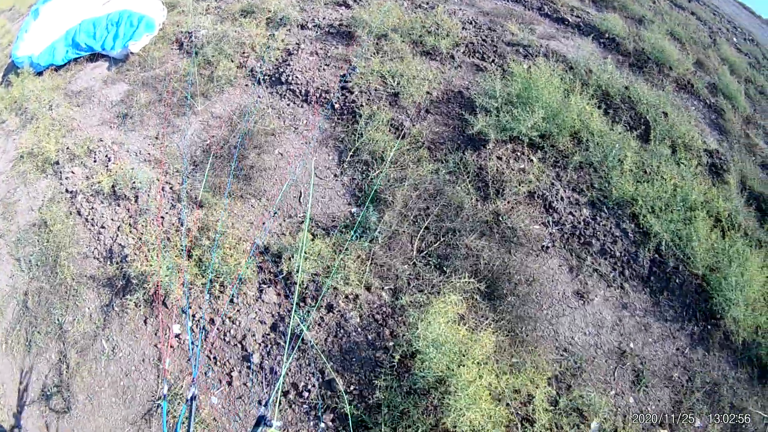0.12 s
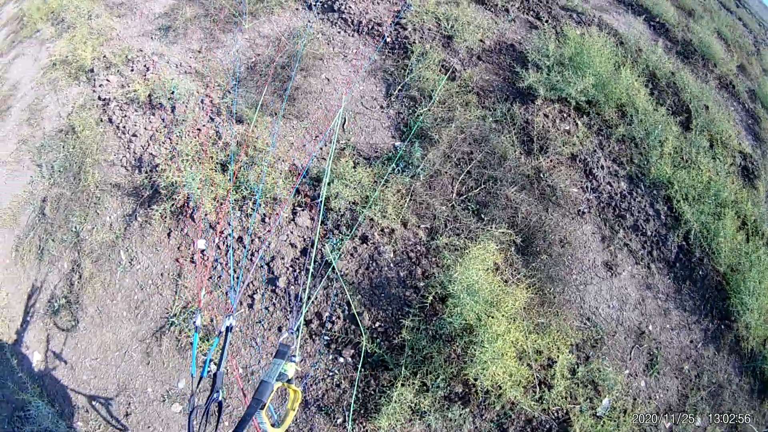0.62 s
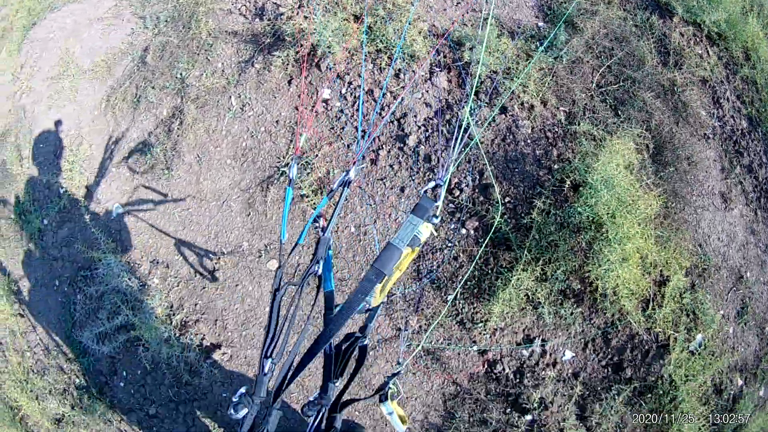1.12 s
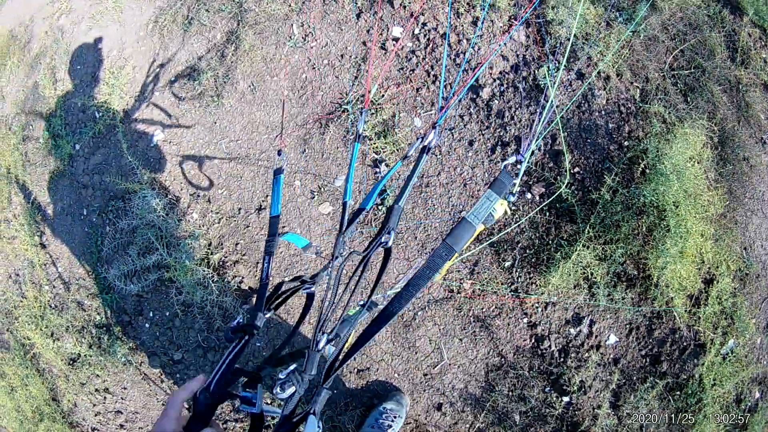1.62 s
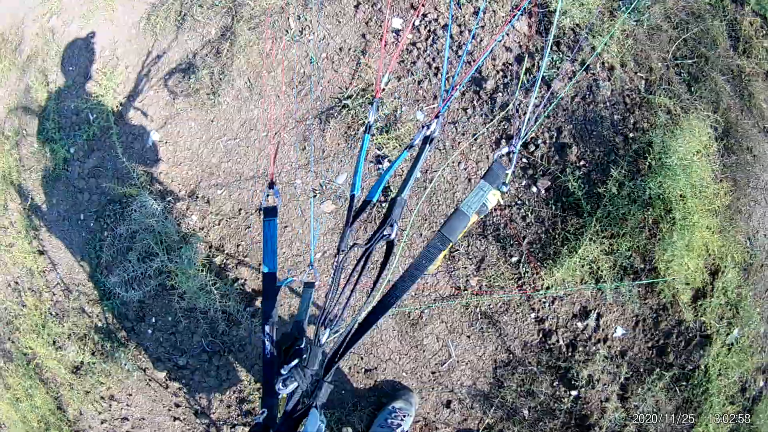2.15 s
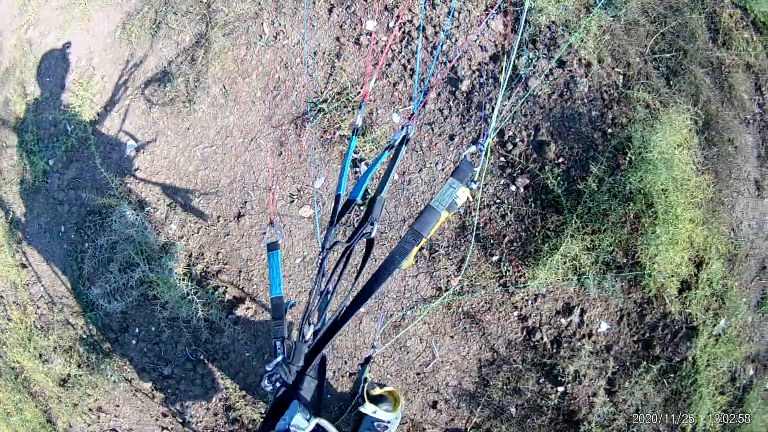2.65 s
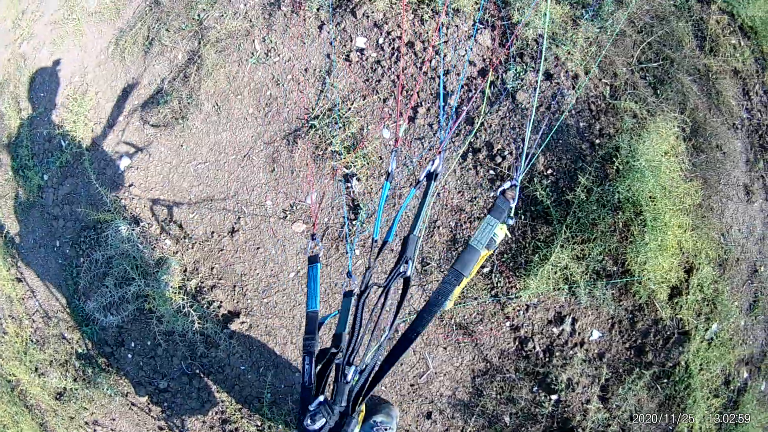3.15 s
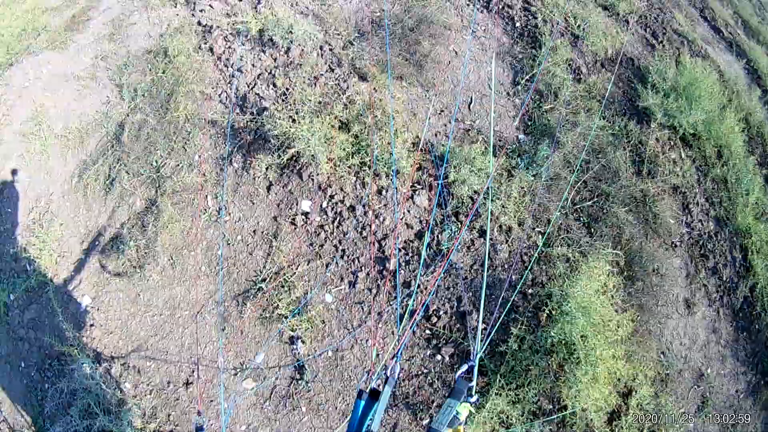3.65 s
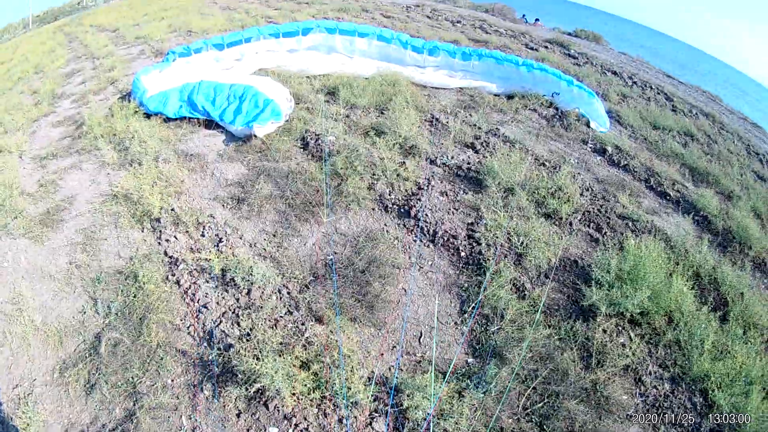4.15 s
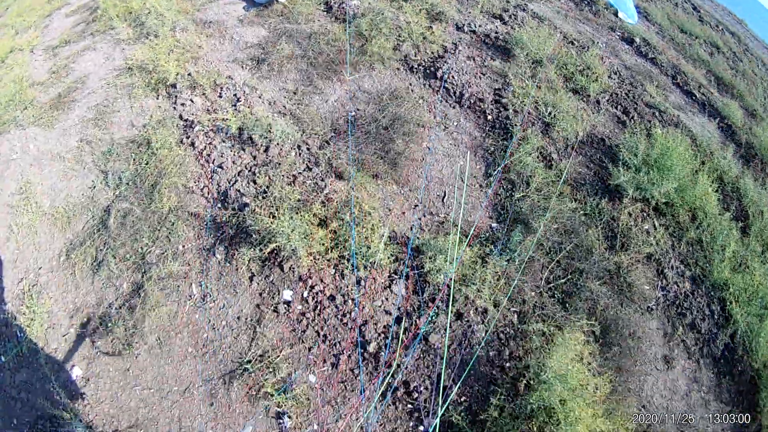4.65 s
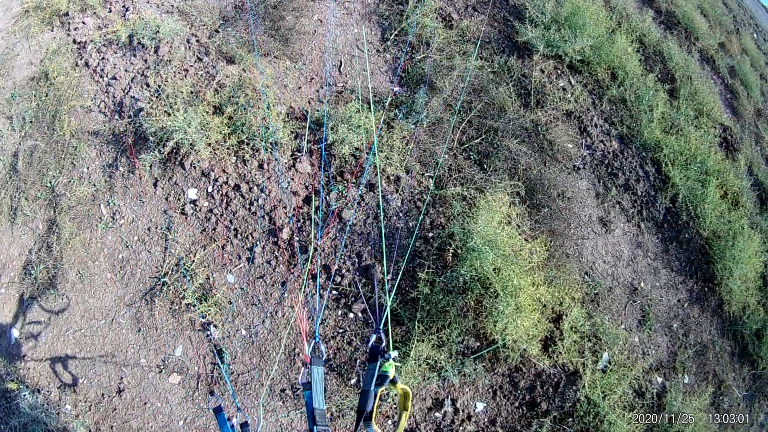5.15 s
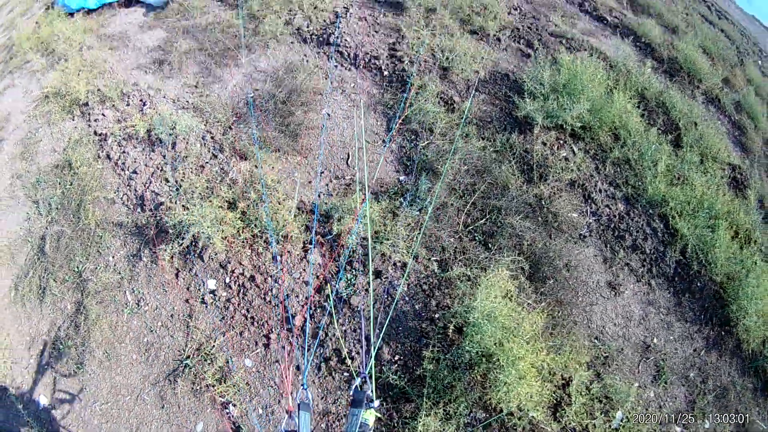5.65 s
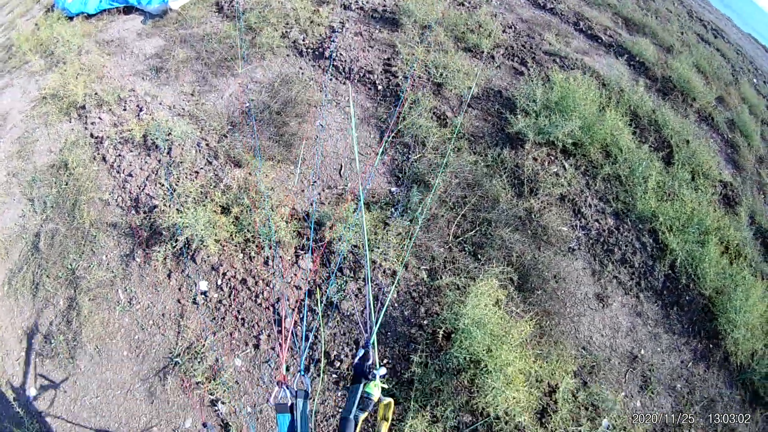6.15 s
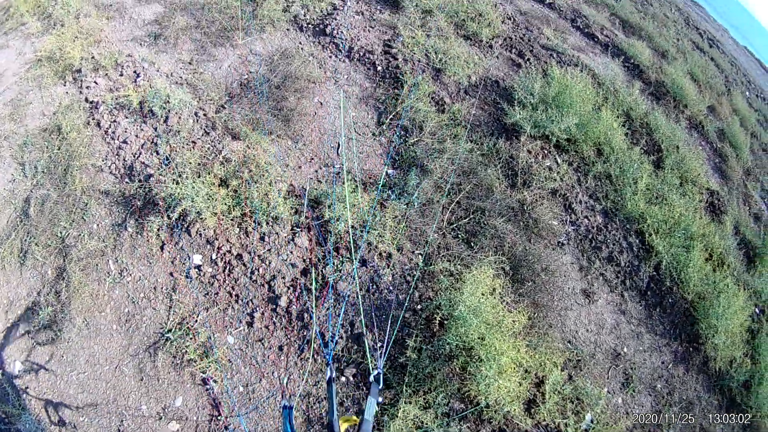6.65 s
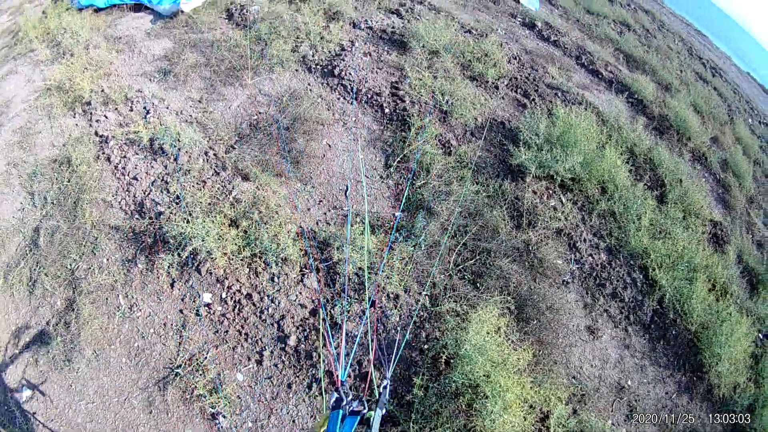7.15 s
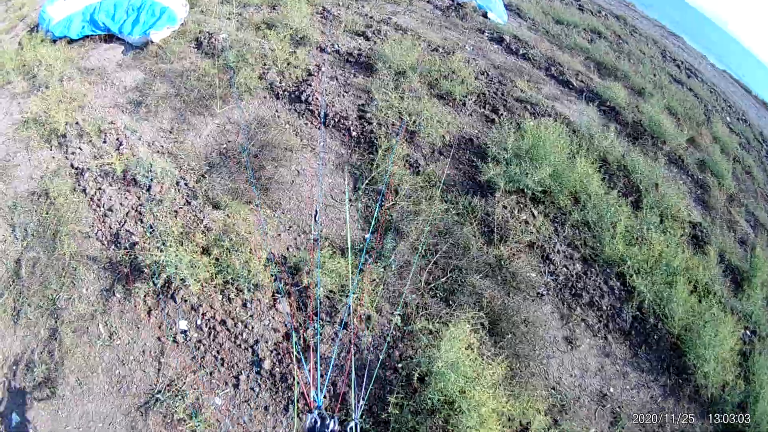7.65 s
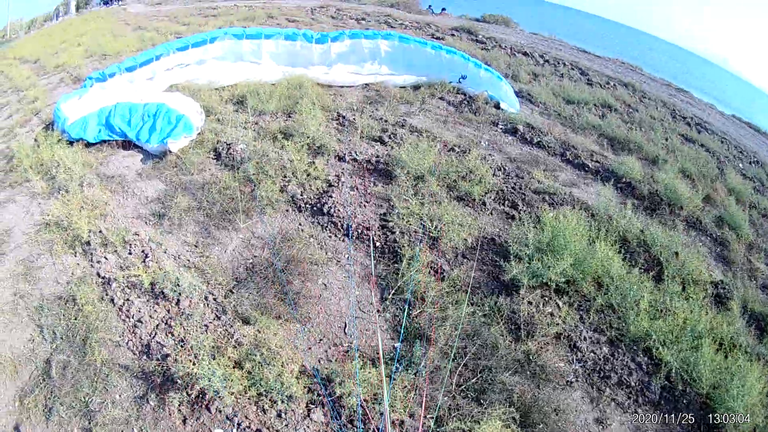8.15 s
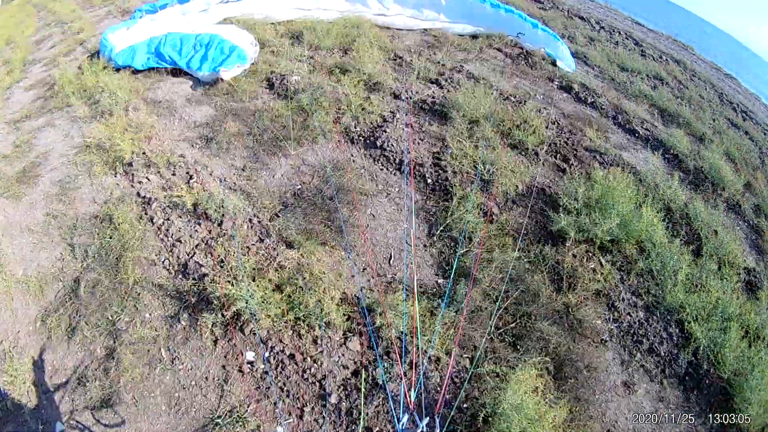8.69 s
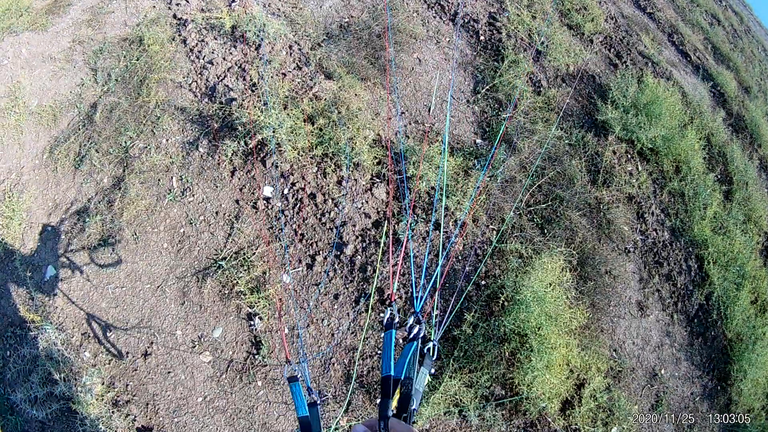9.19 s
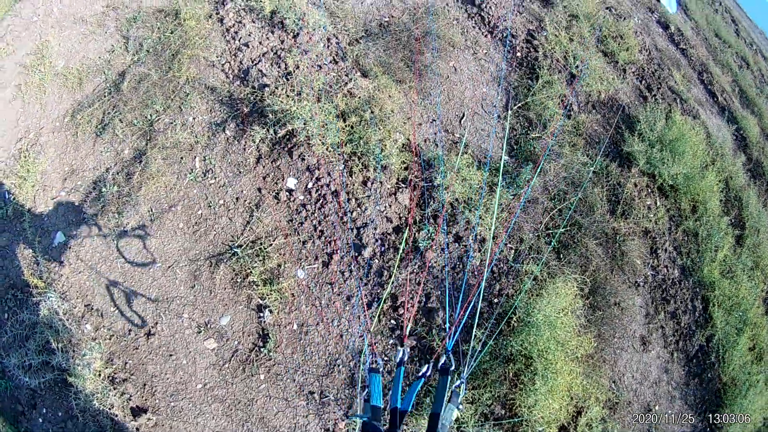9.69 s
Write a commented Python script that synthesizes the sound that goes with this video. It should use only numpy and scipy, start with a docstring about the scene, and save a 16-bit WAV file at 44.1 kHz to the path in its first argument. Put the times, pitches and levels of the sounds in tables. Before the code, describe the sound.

Close, ragged idle of a little backpack engine with loose metallic clatter, a couple of small sharp clicks, and wind rumbling in open scrub.

```python
"""Backpack two-stroke idling in open scrub

A small two-stroke engine idles on a person's back, close to a head-worn microphone, in the open without echo.
Every crank turn thumps the exhaust through sagging and ringing modes; the turns that burn add a bark, a knock
and a tick. Loose metal clatters as noise in resonances, with a knock each turn. Gusts are shaped noise on the
microphone port; a small catch snaps as bursts of ringing modes and a few faint whistles are gliding sines."""
import sys
import numpy as np
from scipy import signal
from scipy.fft import rfft, irfft
from scipy.io import wavfile
from scipy.ndimage import uniform_filter1d

SR = 44100
rng = np.random.default_rng(int(sys.argv[2]) if len(sys.argv) > 2 else 0)


def to_linear_factor(level_db):
    """Convert decibel levels (scalar or array-like) to linear amplitude factors."""
    exponent = np.asarray(level_db, float) / 20
    return 10 ** exponent


def dump(signal):
    """Clip the signal to [-1, 1] and save it as 16-bit WAV at the path in sys.argv[1]."""
    limited = np.clip(np.atleast_2d(signal).T, -1, 1)
    pcm = np.round(limited * 32767).astype(np.int16)
    wavfile.write(sys.argv[1], SR, pcm)


N = 432180
T = np.arange(N) / SR

# crank turns that burn their charge: start_s, bark_db, knock_db (casing, over the bark),
# sharpness_db (upper pipe modes over the bark), tick_db (piston)
BURNS = [(0.1003, -35, -5.5, -23, -58), (0.2038, -46, -6, -10, -63), (0.3113, -42, -5, -22, -67),
         (0.4928, -33.5, -7.5, -20, -59), (0.6288, -37.5, -7, -15, -60), (0.7671, -43, -7, -15, -71),
         (0.9042, -35.5, -11, -15, -61), (1.0079, -39.5, -16, -21, -63), (1.2221, -35, -11.5, -1.5, -55.5),
         (1.3287, -37.5, -10.5, -9, -61), (1.4381, -36, -10, -14, -56), (1.5826, -36, -12.5, -8, -57),
         (1.6899, -31.5, -9, -3.5, -50), (1.8309, -38, -9.5, -14, -53.5), (1.9755, -40.5, -8, -4, -55),
         (2.12, -33, -5.5, 0, -50.5), (2.2573, -35.5, -4.5, -3, -49), (2.3628, -50, -11, -6, -57),
         (2.3969, -40, -15, -12, -63), (2.5022, -36.5, -15, -14, -58), (2.6052, -39.5, -19, -20, -60),
         (2.7082, -41.5, -24, -17, -61), (2.7423, -36, -26, -4, -59), (2.9819, -36.5, -20, -16, -61),
         (3.0864, -38, -14, -17, -54.5), (3.1917, -52, -9, -2, -63), (3.2261, -41.5, -17, -14, -68),
         (3.369, -36.5, -14, -7, -58), (3.4753, -35.5, -7.5, 2, -49), (3.611, -36, -8.5, -15, -54),
         (3.7552, -35, -7.5, 1.5, -50.5), (3.8848, -42.5, -8, -11, -69), (4.0242, -35.5, -14, -24, -64),
         (4.1299, -34, -10, -16, -59), (4.2342, -43.5, -9, -14, -62), (4.3732, -36, -5.5, -3.5, -54),
         (4.4772, -37.5, -9, -16, -59), (4.6143, -35, -9, -4.5, -55), (4.7507, -38.5, -7, -26, -61),
         (4.8572, -36.5, -10, -14, -57), (5.0354, -34, -18, -29, -70), (5.1369, -35, -9, -27, -65),
         (5.2783, -42.5, -17, -23, -66), (5.3502, -30, -10, -16, -53.5), (5.4785, -38, -9, -15, -69),
         (5.591, -41, -18, -10, -69), (5.7331, -31, -7, -14, -49), (5.9348, -37.5, -10, -28, -61),
         (5.9995, -39, -18, -10, -71), (6.108, -39.5, -19, -22, -69), (6.1804, -40.5, -13, -10, -68),
         (6.3153, -34, -17, -12, -69), (6.3816, -37.5, -22, -9, -70), (6.4468, -35, -8.5, -4, -56),
         (6.6138, -32.5, -25, -18, -69), (6.7162, -38, -15, -23, -67), (6.8171, -36, -20, -19, -66),
         (6.9197, -34.5, -12, -17, -64), (7.1216, -35.5, -17, -15, -75), (7.2213, -45, -12, -15, -63),
         (7.3569, -42, -13, -15, -67), (7.4252, -34.5, -19, -20, -65), (7.5249, -34, -17, -17, -61),
         (7.6593, -38.5, -17, -28, -67), (7.794, -43, -17, -4, -71), (7.8613, -41.5, -16, -13, -75),
         (7.929, -36, -16, -23, -71), (8.0654, -34, -15, -26, -64), (8.2702, -35.5, -10, -21, -65),
         (8.3726, -33.5, -9, -10, -57), (8.511, -35.5, -2.5, -17, -48.5), (8.6438, -39.5, -8, -13, -64),
         (8.7158, -35.5, -8, -20, -61), (8.8185, -35.5, -10, -24, -58), (8.9556, -38.5, -8, -19, -59.5),
         (9.0655, -46, -14, -13, -69), (9.487, -32, -13, -10, -56), (9.6159, -44, -12, -18, -72),
         (9.7175, -33.5, -22, -9, -63)]
# how hard loose parts knock each turn as the harness shifts: time_s, level_db
RATTLE = [(0., 2), (1., -3), (2., -1), (3., -1), (3.8, 0.5), (4.4, 1), (5., -0.5), (6., 2), (7., -1.),
          (7.7, 1), (8.2, 4), (8.8, 0.5), (9.2, 0.5), (9.8, -2.5)]


def level(x, db):
    """Scale to an rms level."""
    return x * to_linear_factor(db) / np.sqrt(np.mean(x ** 2))


def colour(points):
    """Noise with a spectrum drawn through (Hz, dB) points, silent outside them."""
    hz, db = np.transpose(points)
    f = np.fft.rfftfreq(N, 1 / SR) + 1
    gain = to_linear_factor(np.interp(np.log(f), np.log(hz), db, -200, -200))
    return irfft(rfft(rng.standard_normal(N)) * gain, N)


def band(hz, width_hz):
    """Noise passed twice through one resonance, rms 1."""
    b, a = signal.iirpeak(hz, hz / width_hz, fs=SR)
    once = signal.lfilter(b, a, rng.standard_normal(N))
    return level(signal.lfilter(b, a, once), 0)


def walk(rate_hz):
    """Random levels held for 1 / rate_hz seconds and slewed twice; spread near 1."""
    k = int(SR / rate_hz)
    held = np.repeat(rng.standard_normal(N // k + 1), k)
    return 1.3 * uniform_filter1d(uniform_filter1d(held, k), k)[:N]


def train(s, size):
    """Clicks of given sizes at given times in seconds."""
    k = np.round(np.asarray(s) * SR).astype(int)
    keep = (k >= 0) & (k < N)
    return np.bincount(k[keep], (size * np.ones(len(k)))[keep], N)


def ring(clicks, hz, t60, swell_ms, sag_hz=0, sag_ms=1):
    """One mode that swells, then dies away, after each click; its pitch may sag to hz."""
    t = T[:int(abs(t60) * SR) + 64]
    swell = 1 - np.exp(-(1000 * t / swell_ms) ** 2)
    shape = swell * np.exp(-np.log(1000) * t / t60)
    cycles = hz * t + sag_hz * sag_ms / 1000 * (1 - np.exp(-1000 * t / sag_ms))
    return signal.oaconvolve(clicks, -shape / shape.max() * np.sin(2 * np.pi * cycles))[:N]


def fading(clicks, fade_ms, samples, smooth):
    """An envelope that jumps at each click and fades exponentially, its edges smoothed."""
    decay = np.exp(-1000 * T[:samples] / fade_ms)
    return uniform_filter1d(signal.oaconvolve(clicks, decay)[:N], size=smooth)


def crank():
    """Times of all turns: each burn kicks the shaft, which slows until the next."""
    turn_hz, slowing = 28.9, 0.15  # nominal rate; share of the speed lost to either side of the mean
    s = np.array(BURNS)[:, 0]
    s = np.r_[s[0] - 4 / turn_hz, s, s[-1] + 4 / turn_hz]
    gap = np.diff(s)
    count = np.maximum(np.round(gap * turn_hz), 1).astype(int)
    u = np.concatenate([np.arange(c) / c for c in count])
    return np.repeat(s[:-1], count) + np.repeat(gap, count) * (u - slowing * u * (1 - u))


def exhaust(turns):
    """Pumped gas thumps and rings the low pipe modes each turn; burnt gas thumps from a higher pitch."""
    # exhaust and intake modes: pitch_hz, t60_s, swell_ms, lag_ms (after the port opens; negative: rung by
    # the squeeze before it), turn_db (on every turn), burn_db (over the bark)
    pipe = [(250, 0.05, 6, -18, -56, -4), (247, 0.075, 6.5, 11.5, -43, -0.5),
            (276.4, 0.036, 10.2, 14, -45, -7.5), (378, 0.055, 4.7, 1.2, -42.5, -14),
            (416, 0.091, 2.4, 3.5, -50.5, -29.5), (700, 0.012, 1.5, -0.5, -55, -11),
            (707.6, 0.051, 1.1, 14, -52.5, -21)]
    # the pitch sags as the gas leaves: last Hz, Hz above it at the start, sag ms, t60 s, swell ms, lag ms
    cold_thump, hot_thump = (107, 46, 8.3, .075, 7.2, 0), (101, 179, 7, .115, 6.7, -3)
    cold_db, hot_db, full_burn_db = -27.2, -30.2, -39  # a bark under the last leaves part of the gas cold
    jitter_ms, scatter_db, mode_scatter_db = 1.2, 1.0, 1.1
    s, bark_db = np.transpose(BURNS)[:2]
    late, big = rng.standard_normal((len(turns), 2)).T
    hot = np.zeros(len(turns))
    hot[np.isin(turns, s)] = np.clip(to_linear_factor(bark_db - full_burn_db), 0, 1)
    out = 0
    for thump, size in ((cold_thump, (1 - hot) * to_linear_factor(cold_db)), (hot_thump, hot * to_linear_factor(hot_db))):
        hz, sag_hz, sag_ms, t60, swell_ms, lag_ms = thump
        start = turns + (lag_ms + jitter_ms * late * (1 - hot)) / 1000
        thumps = train(start, size * to_linear_factor(scatter_db * big))
        out = out + ring(thumps, hz, t60, swell_ms, sag_hz, sag_ms)
    for hz, t60, swell_ms, lag_ms, turn_db, burn_db in pipe:
        # higher modes follow the ragged detail of each puff, so they vary more
        own_db = mode_scatter_db * np.sqrt(hz / cold_thump[0]) * rng.standard_normal(len(turns))
        start = turns + (lag_ms + jitter_ms * late) / 1000
        puffs = train(start, to_linear_factor(turn_db + scatter_db * big + own_db))
        burn_scatter_db = mode_scatter_db * rng.standard_normal(len(s))
        burns = train(s + lag_ms / 1000, to_linear_factor(bark_db + burn_db + burn_scatter_db))
        out = out + ring(puffs + burns, hz, t60, swell_ms)
    # a small outlet radiates little below its first mode
    return signal.sosfilt(signal.butter(2, 85, "high", fs=SR, output="sos"), out)


def bark():
    """The pressure dip of a burn strikes several pipe modes together, timed to dip at one moment."""
    # pipe modes: pitch_hz, t60_s, level_db (over the bark), share (of the sharpness it follows, 0-1)
    bark_modes = [(227, 0.02, -1, 0.23), (251, 0.04, -13, .2), (380, 0.07, 2, 0.), (584, 0.083, -6.5, 1),
                  (760, 0.06, -8, 1)]
    dip_ms, usual_sharp_db, pitch_scatter = 2.3, -12.5, 0.04  # the dip is timed from the port opening
    s, bark_db, _, sharp_db, _ = np.transpose(BURNS)
    # the heat of the gas differs from burn to burn and shifts the pipe a little
    heat = rng.integers(-1, 2, len(s))
    out = 0
    for hz, t60, db, share in bark_modes:
        # a mode that follows the sharpness in full takes it directly over the bark
        size = to_linear_factor(bark_db + db + share * (sharp_db - usual_sharp_db * (share < 1)))
        extra_cycles = int(hz > 300)  # higher modes take one more cycle to build up
        for step in (-1, 0, 1):
            f = hz * (1 + pitch_scatter * step)
            start = s + dip_ms / 1000 - (1 / 4 + extra_cycles) / f
            swell_ms = 1000 * (0.15 + extra_cycles) / f
            out = out + ring(train(start, size * (heat == step)), f, t60, swell_ms)
    return out


def casing(turns, ring_db):
    """A burn knocks the metal around the cylinder; every turn faintly rings its longest mode."""
    # casing modes, the longest first: pitch_hz, t60_s, level_db (over the knock)
    casing_modes = [(920, 0.2, -10), (1100, 0.029, -5.5), (1250, 0.024, 2), (1450, 0.012, -3),
                    (1970, 0.018, -10)]
    idle_db, idle_scatter_db = -68, 5  # before the gain of the head's facing
    s, bark_db, knock_db = np.transpose(BURNS)[:3]
    knocks = train(s - 0.002, to_linear_factor(bark_db + knock_db))
    modes = [to_linear_factor(db) * ring(knocks, hz, t60, 1.6) for hz, t60, db in casing_modes]
    start = turns + 0.003 * rng.random(len(turns))
    idle = train(start, to_linear_factor(idle_db + idle_scatter_db * rng.standard_normal(len(turns))))
    # the longest ring is the most directional
    modes[0] = (modes[0] + ring(idle, *casing_modes[0][:2], 3.0)) * to_linear_factor(ring_db)
    return sum(modes)


def shell(turns):
    """Each turn thumps the muffler shell as the intake closes; its modes answer unevenly."""
    # shell modes: pitch_hz, t60_s, place (in the turn, 0-1), level_db (before rattle and scatter)
    shell_modes = [(722, 0.025, 0.7, -56), (1090, 0.019, .7, -62.5), (1240, .035, .7, -60),
                   (1385, 0.06, .72, -59), (1615, 0.013, 0.8, -63), (1866, 0.036, .63, -64),
                   (2030, .02, .64, -68.5), (2584, 0.021, .68, -73), (3700, .025, 0.6, -78),
                   (4316, 0.023, .6, -79), (4930, .06, .55, -85), (5430, 0.07, 0.4, -82),
                   (5980, .06, .5, -90)]
    swell_ms, jitter_ms, scatter_db = 2.5, 1.5, 3
    out = 0
    for hz, t60, place, db in shell_modes:
        late, big = rng.standard_normal((len(turns) - 1, 2)).T
        s = turns[:-1] + place * np.diff(turns) + jitter_ms * late / 1000
        rattle_db = np.interp(s, *np.transpose(RATTLE))
        out = out + ring(train(s, to_linear_factor(db + scatter_db * big + rattle_db)), hz, t60, swell_ms)
    return out


def piston(turns, tick_gain_db, tilt_db):
    """The piston ticks faintly every turn and hard with a burn's knock, each with a short spit of gas."""
    # tick modes: pitch_hz, t60_s, level_db (over the tick), share (of the tilt it follows)
    tick_modes = [(2300, .012, -7, 0.), (2650, .014, -10, -.1), (3000, .032, -3, -.25),
                  (3700, .02, -3.5, .35), (4350, .02, -13, .3), (5450, .03, -27, .2)]
    early_ms, tilt_scatter_db = 1.185, 3.0
    # faint ticks: level at a tick gain of 0 dB, dB per dB of that gain, scatter, tilt, lead on the port
    faint_db, follows, faint_scatter_db, faint_tilt_db, faint_early_ms = -60.5, 0.7, 4.0, 6, 3
    # gas with the tick, and gas blowing by after it; levels over the tick
    spit_hz, spit_width_hz, spit_ms, spit_db = 2770, 1660, 11, -3
    blow_hz, blow_width_hz, blow_ms, blow_db, blow_lag_ms = 5600, 2200, 11, -22, 10
    s, db = np.transpose(BURNS)[[0, -1]]
    s = s - early_ms / 1000
    tilt_db = np.interp(s, T, tilt_db) + tilt_scatter_db * rng.standard_normal(len(s))
    faint = faint_db + follows * np.interp(turns, T, tick_gain_db)
    faint = faint + faint_scatter_db * rng.standard_normal(len(turns))
    s = np.r_[s, turns - faint_early_ms / 1000]
    db = np.r_[db, faint]
    tilt_db = np.r_[tilt_db, np.full(len(turns), faint_tilt_db)]
    ticks = sum(ring(train(s, to_linear_factor(db + mode_db + share * tilt_db)), hz, t60, 1.3)
                for hz, t60, mode_db, share in tick_modes)
    spit = fading(train(s, to_linear_factor(db + spit_db)), spit_ms, 3000, 300)
    blow = fading(train(s + blow_lag_ms / 1000, to_linear_factor(db + blow_db)), blow_ms, 3000, 200)
    return ticks + blow * band(blow_hz, blow_width_hz) + spit * band(spit_hz, spit_width_hz)


def clatter(turns, clatter_db):
    """Piston, reeds, belt and gas: noise in the metal's resonances, knocked once a turn and fading."""
    # resonances: centre_hz, width_hz, level_db (over the clatter), place (of the knock in the turn, 0-1),
    # knock_db (over the steady part before rattle and scatter; below 0 it is a dip)
    bands = [(528, 257, 2, 0.8, -1.5), (689, 147, 0, 0.6, -3), (911.6, 53, -10, 0.5, -3.5),
             (1072, 530, -7, .75, 4), (1271, 540, -7, 0.71, 7.5), (1875, 370, -21.5, 0.52, 13.5),
             (2564, 550, -27.5, 0.55, 11.5), (2820, 130, -32, 0.8, -4), (3700, 660, -26, 0.8, 1.5),
             (4410, 850, -29.5, 0.5, 5), (5290, 1800, -31.5, 0.3, 8), (6540, 2400, -35.5, .7, 6.5)]
    knock_fade = 0.28  # share of a turn
    shared_scatter_db, own_scatter_db = 2.5, 3.0
    after_burn_db, after_burn_ms = 32, 17  # extra gain over the bark, and its fade
    phase = np.interp(T, turns, np.arange(len(turns)))
    force_db = shared_scatter_db * rng.standard_normal(len(turns) + 1)
    rattle_db = np.interp(T, *np.transpose(RATTLE))
    # a burn shakes everything harder for a moment
    s, bark_db = np.transpose(BURNS)[:2]
    shaken = fading(train(s, to_linear_factor(bark_db + after_burn_db)), after_burn_ms, 6000, 300)
    out = 0
    for hz, width_hz, db, place, knock_db in bands:
        since = phase - place + 1
        turn_db = force_db + own_scatter_db * rng.standard_normal(len(force_db))
        knock = np.exp(-(since % 1) / knock_fade) * (to_linear_factor(knock_db) - 1)
        knock = knock * to_linear_factor(turn_db[since.astype(int)] + rattle_db)
        gain = to_linear_factor(clatter_db + db + 2.2 * walk(70))
        out = out + gain * (1 + shaken + uniform_filter1d(knock, size=60)) * band(hz, width_hz)
    return out


def catch():
    """Each snap rings one loud mode of its own and the small modes of the catch."""
    # the catch, pressed and let go: start_s, level_db, loudest_hz, small_db (small modes over the snap),
    # tilt_db (of the small modes per octave, about 4000 Hz)
    snaps = [(0.386, -48, 4400, 2, 1), (0.39, -27, 2050, -5, -1.5), (0.3953, -28, 4350, -4, -1),
             (0.401, -50.5, 5500, 1.5, -2.5), (0.5324, -45.5, 3840, -21, -4), (0.5427, -52, 3700, -7, -7),
             (4.792, -54, 5560, -10, 6.5), (4.7976, -36.5, 1500, -3, 4), (4.8031, -27.5, 3230, -17, 1),
             (4.808, -50.5, 2280, 3.5, -3), (4.924, -47, 3060, -6, -5.5), (4.9362, -50.5, 4400, -10, -5),
             (6.9858, -55, 4100, -10, -5)]
    # small modes: pitch_hz, t60_s, level_db (relative)
    small_modes = [(1230, .02, -17), (1480, .02, -10), (1880, 0.006, -4), (2390, 0.0023, -2),
                   (3010, 0.013, -11), (3860, 0.006, -3), (4500, 0.0032, 2), (5840, 0.0027, -2),
                   (6730, 0.019, -18), (7440, 0.011, -10.5), (8500, 0.014, -21), (9300, 0.0066, -17),
                   (10870, 0.0047, -11), (12200, 0.007, -16), (14400, .009, -19)]
    decay_ms, chatter_ms, chatter_fade_ms = 2.2, 9.0, 2.7
    out, chatter = 0, []
    for s, db, hz, small_db, _ in snaps:
        out = out + ring(train([s], to_linear_factor(db)), hz, np.log(1000) * decay_ms / 1000, 0.19)
        # the parts chatter for a moment as they seat
        late, big = rng.random((60, 2)).T
        late[0], big[0] = 0, 1
        size = to_linear_factor(db + small_db) * (2 * big - 1) * np.exp(-late * chatter_ms / chatter_fade_ms)
        chatter.append((s + late * chatter_ms / 1000, size))
    s, size = np.transpose(chatter, (1, 0, 2))
    tilt_db = np.array(snaps)[:, -1:]
    for hz, t60, db in small_modes:
        mode_size = size * to_linear_factor(db + tilt_db * np.log2(hz / 4000))
        out = out + ring(train(s.ravel(), mode_size.ravel()), hz, t60, 0.17)
    return out


def whistles():
    """Short thin tones: sines that glide slightly in pitch under a rounded swell."""
    # tones: start_s, length_s, first_hz, last_hz, level_db
    tones = [(5.038, 0.058, 1250, 1224, -49.5), (5.198, 0.035, 1055, 1090, -52),
             (5.364, 0.06, 1345, 1307, -50), (5.444, 0.023, 1450, 1420, -52)]
    out = np.zeros(N)
    for s, length, first_hz, last_hz, db in tones:
        u = np.clip((T - s) / length, 0, 1)
        cycles = np.cumsum(first_hz + (last_hz - first_hz) * u) / SR
        out += to_linear_factor(db) * np.sin(np.pi * u) ** 0.66 * np.sin(2 * np.pi * cycles)
    return out


def wind():
    """Eddies on the microphone port: a rumble, brighter buffeting in the gusts, and short puffs."""
    # rumble spectrum: pitch_hz, level_db (per Hz, relative)
    rumble = [(10, -9), (22, -2), (34, 0), (55, -5), (80, -12), (120, -30)]
    # stronger gusts carry smaller, faster eddies: pitch_hz, level_db (per Hz, relative)
    buffet = [(40, -12), (72, -0.5), (115, -4), (200, -8), (300, -13), (500, -24.5), (800, -61.5)]
    # gusts over the breeze: peak_s, level_db, length_s
    gusts = [(0.0, -39.5, 0.2), (1, -47, 0.17), (1.977, -40.5, 0.41), (2.59, -41, 0.3),
             (3.376, -39.5, 0.24), (3.78, -40, 0.11), (4.035, -40, 0.28), (4.355, -37.5, 0.2),
             (4.697, -38, 0.25), (5.043, -36.5, 0.11), (5.298, -37, 0.19), (5.58, -33.5, 0.24),
             (5.83, -31.5, 0.13), (6.1, -34.5, 0.17), (6.301, -34, 0.049), (6.447, -36, 0.2),
             (6.612, -33, 0.19), (6.994, -39, 0.28), (7.356, -37, 0.37), (7.694, -37.5, 0.14),
             (8.0, -37.5, 0.19), (8.585, -41, 0.26), (8.826, -33, 0.05), (9.267, -42.5, 0.075),
             (9.523, -39, 0.24)]
    # short eddies that strike the port: start_s, fade_ms, centre_hz, width_hz, level_db
    eddies = [(.99, 30, 55, 30, -34), (2.555, 8, 50, 40, -29), (4.69, 25, 35.4, 25, -25),
              (5.53, 46, 70, 40, -28), (5.631, 37, 90, 70.5, -30), (5.72, 30, 60, 39.8, -34),
              (5.809, 40, 110, 90, -30.5), (5.88, 28, 70, 50, -30.5), (5.98, 46, 109, 60, -32),
              (6.28, 15, 69.5, 50, -23), (6.6, 36, 65, 50, -26), (7.29, 40, 100, 60, -34),
              (7.44, 28, 240, 80, -30.5), (7.49, 40, 113, 50, -32), (7.68, 26, 90, 59.7, -40),
              (8.5, 67, 347, 258, -39), (9.2, 22, 176, 100, -31.5), (9.215, 35, 470, 220, -42.5),
              (9.265, 79, 324, 90, -41)]
    breeze_db, rise = -47, 0.44  # wind between gusts; share of a gust's length spent rising
    buffet_at_40_db, growth, lumps_db = -45, 1.3, 3  # level in a -40 dB gust, dB per dB of gust, flutter
    power = to_linear_factor(2 * breeze_db)
    for s, db, length in gusts:
        side = length * np.where(T < s, 2 * rise, 2 - 2 * rise)
        power = power + to_linear_factor(2 * db) * np.exp(-(2 * (T - s) / side) ** 2)
    gust_db = 10 * np.log10(power)
    buffet_db = buffet_at_40_db + growth * (gust_db + 40) + lumps_db * walk(15)
    puffs = 0
    for s, fade_ms, hz, width_hz, db in eddies:
        fade = (T > s) * np.exp(-1000 * abs(T - s) / fade_ms)
        puffs = puffs + to_linear_factor(db) * uniform_filter1d(fade, size=400) * band(hz, width_hz)
    return puffs + level(colour(rumble), 0) * to_linear_factor(gust_db) + level(colour(buffet), 0) * to_linear_factor(buffet_db)


def scene():
    """Engine, wind and small sounds in the open, without echo; the head's facing shades the engine."""
    # as the head turns: time_s, ring_db (casing, used about its mean), tick_db (gain of the faint ticks),
    # tilt_db (upper tick modes over lower)
    facing = [(0.0, -51.5, -28, 5), (0.3, -62, -17, -8), (0.95, -54, -9, -16), (1.701, -57, -10.5, -12),
              (2.3, -60.5, -13, -18), (2.6, -59.5, -17, -29), (3.1, -60.5, -8, -23), (3.5, -59, -12, -4),
              (3.8, -60.5, -10, -5), (4.1, -51.5, -22, -21), (4.65, -51.5, -16, -22), (5.201, -69, -10, -2),
              (6.5, -57.5, -11.5, -7), (7.3, -64.5, -19, -2), (8.5, -59, -12, -3), (8.85, -57, -20, 2),
              (9.1, -74, -20, 9), (9.8, -76, -21, -4)]
    s, *columns = np.transpose(facing)
    ring_db, tick_gain_db, tilt_db = (np.interp(T, s, c) for c in columns)
    ring_db = ring_db - np.mean(ring_db)
    turns = crank()
    engine = exhaust(turns) + bark() + casing(turns, ring_db) + shell(turns)
    engine = engine + piston(turns, tick_gain_db, tilt_db)
    # the clatter follows the casing ring slightly
    engine = engine + clatter(turns, -56.9 + 0.052 * ring_db)
    return (engine + wind() + catch() + whistles())[None]


def top_cut(x):
    """Nothing passes above the cut-off."""
    return signal.sosfilt(signal.butter(12, 16500, fs=SR, output="sos"), x)


def record(dry):
    """The microphone housing takes a dip out of the treble; the microphone adds its own hiss."""
    # hiss spectrum: pitch_hz, level_db (per Hz, relative)
    hiss = [(2000, -5.5), (6000, -8.5), (8000, 2.5), (10000, 1.5), (13000, 2), (16000, 4.5)]
    notch_hz, notch_width_hz, hiss_db = 7900, 1000, -82
    notched = signal.lfilter(*signal.iirnotch(notch_hz, notch_hz / notch_width_hz, fs=SR), dry)
    return top_cut(notched + level(colour(hiss), hiss_db))


dry = scene()
out = record(dry)
dump(out)
```